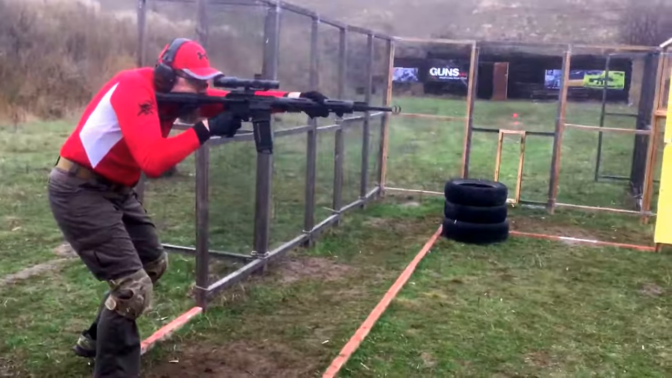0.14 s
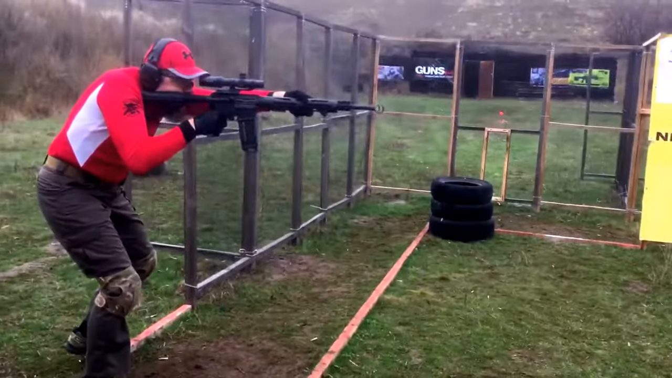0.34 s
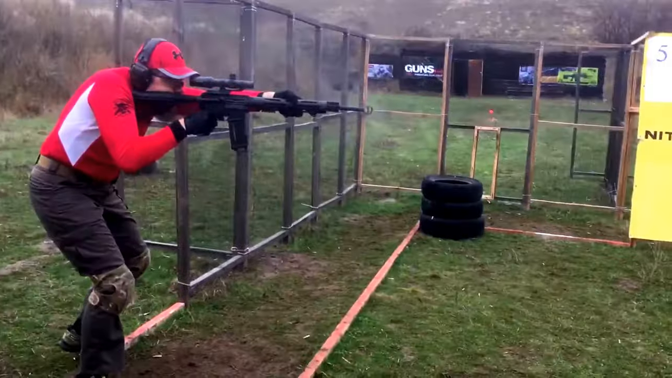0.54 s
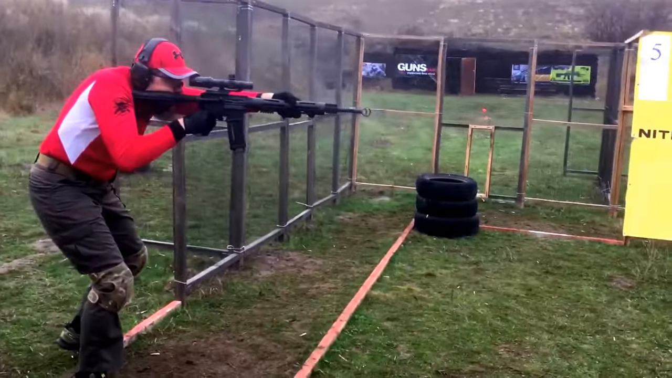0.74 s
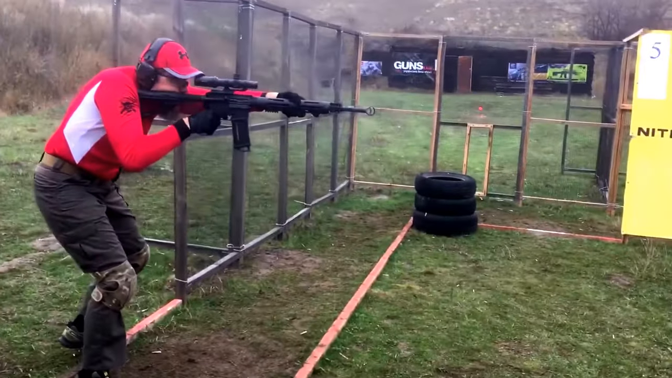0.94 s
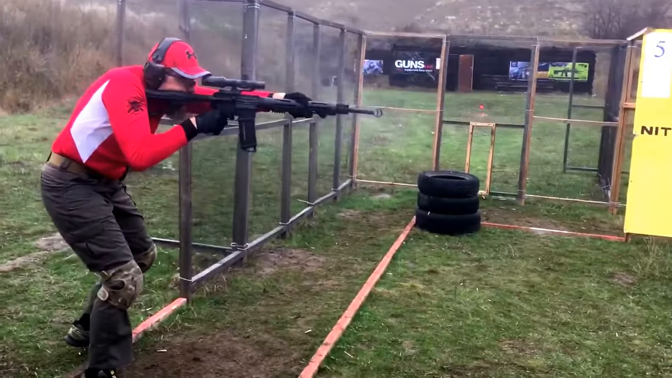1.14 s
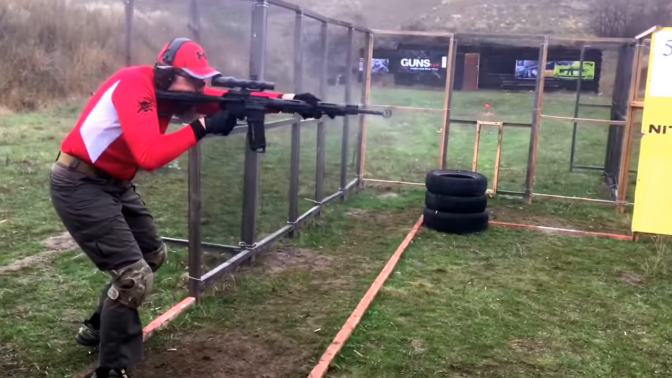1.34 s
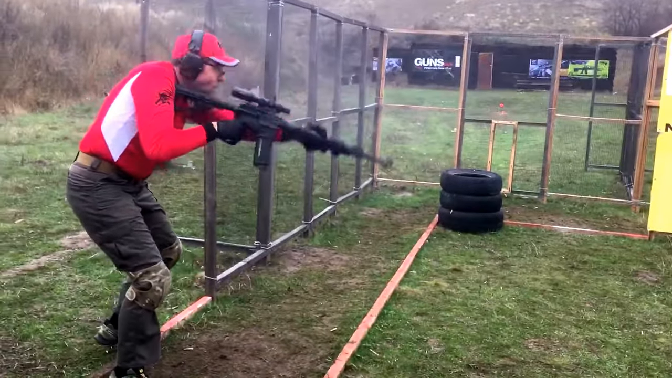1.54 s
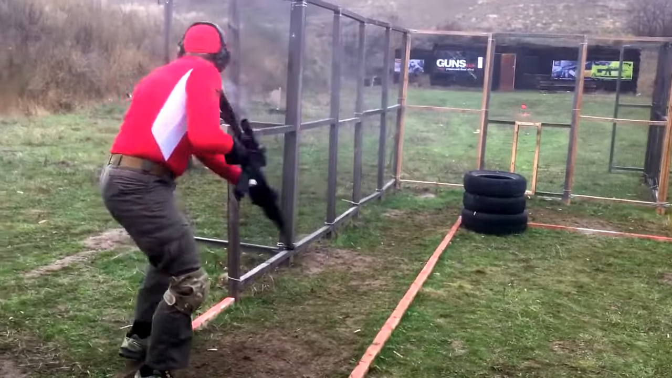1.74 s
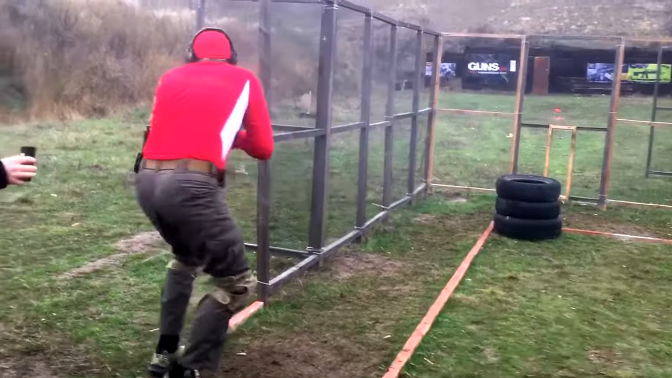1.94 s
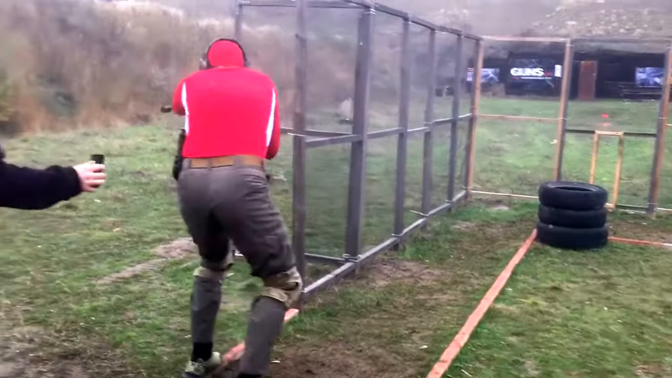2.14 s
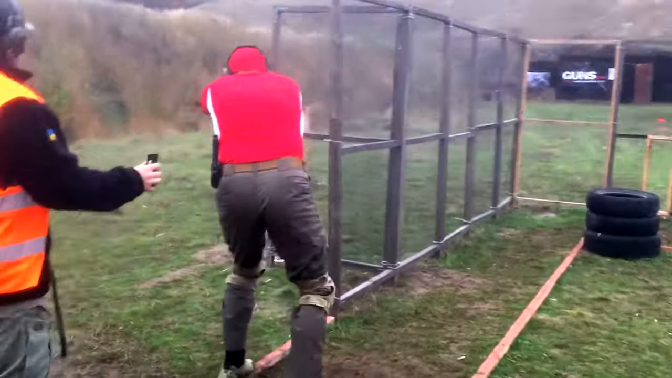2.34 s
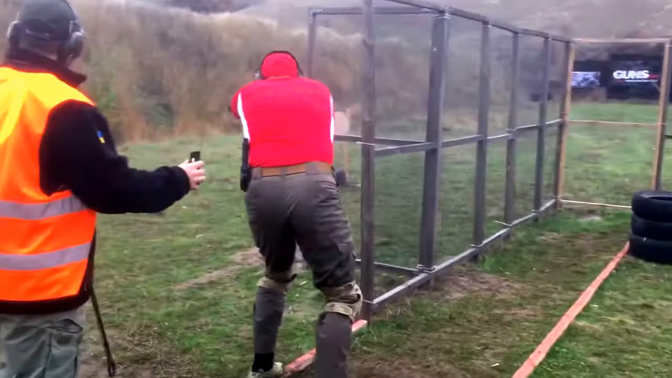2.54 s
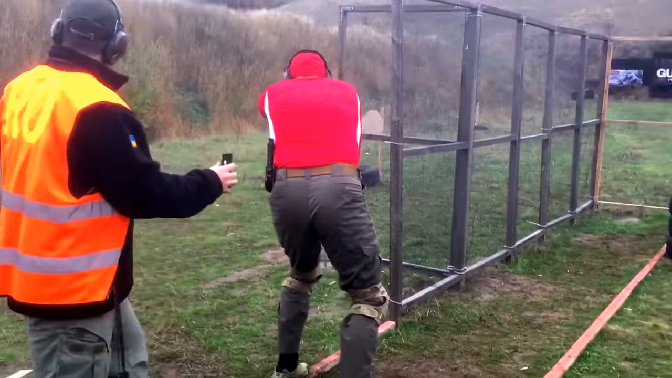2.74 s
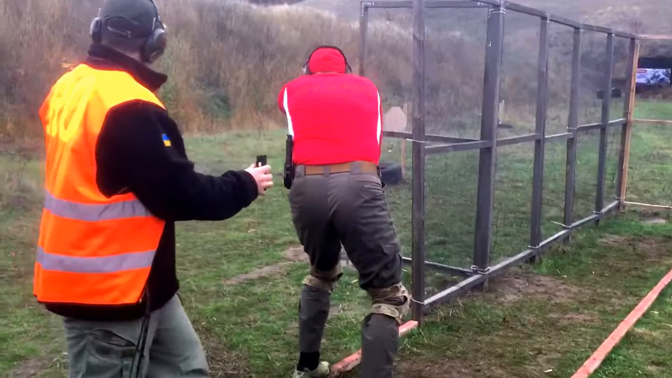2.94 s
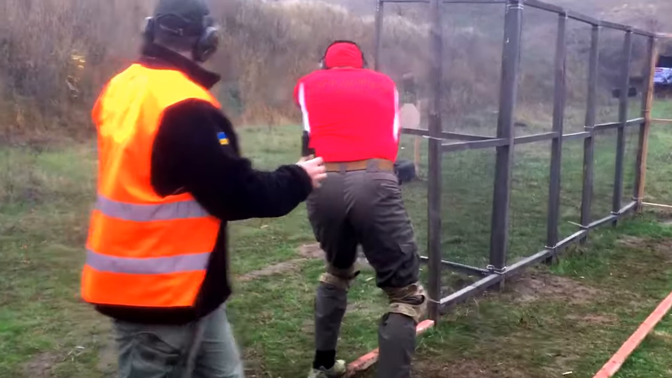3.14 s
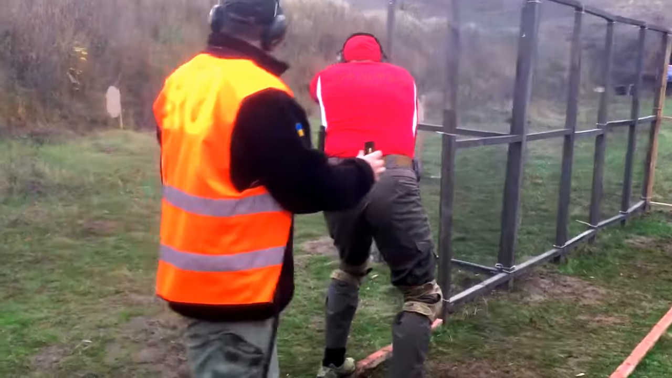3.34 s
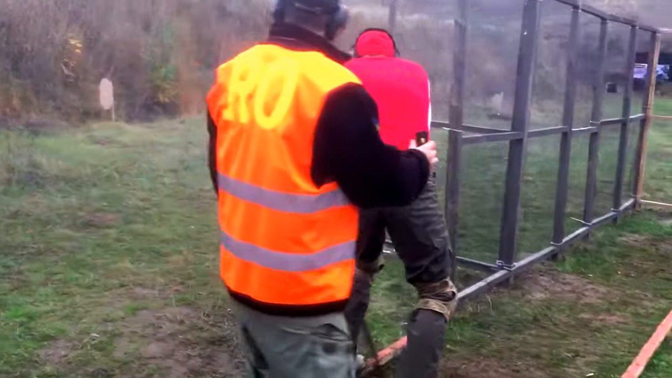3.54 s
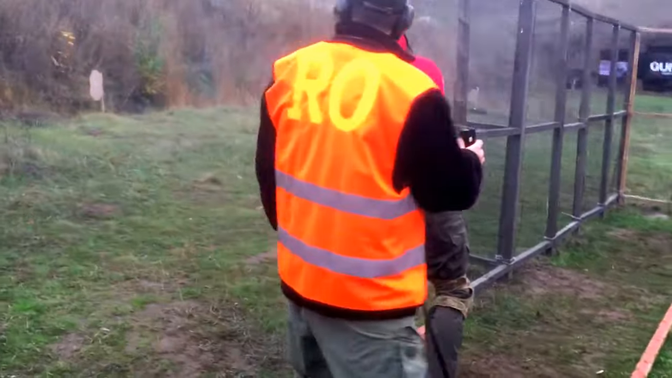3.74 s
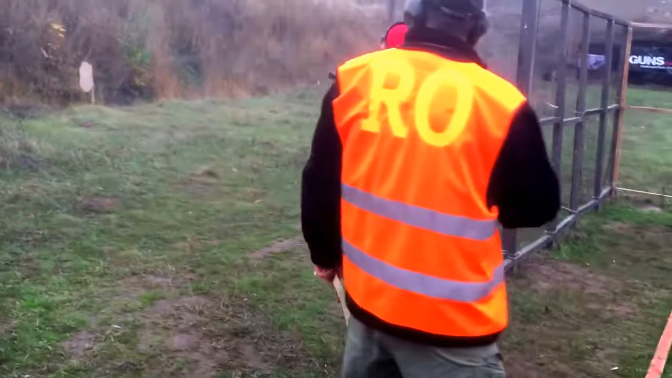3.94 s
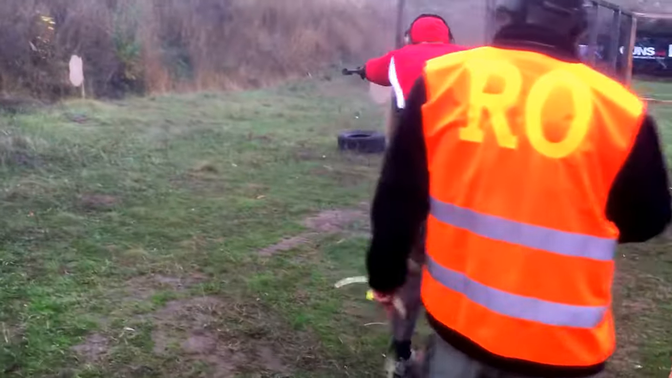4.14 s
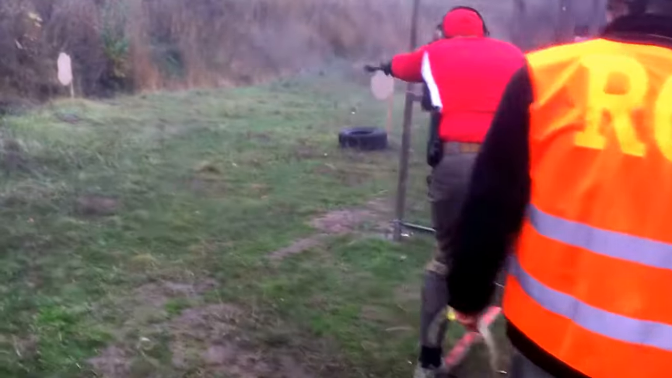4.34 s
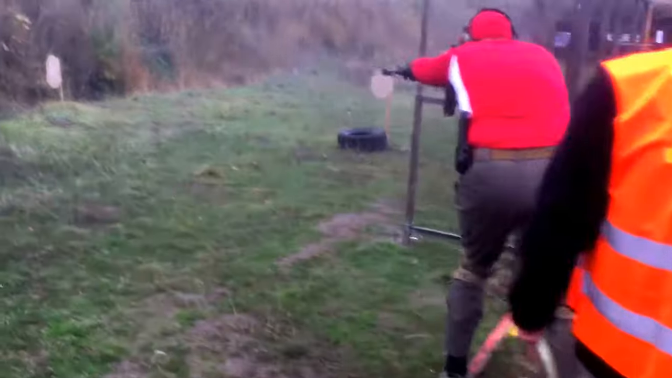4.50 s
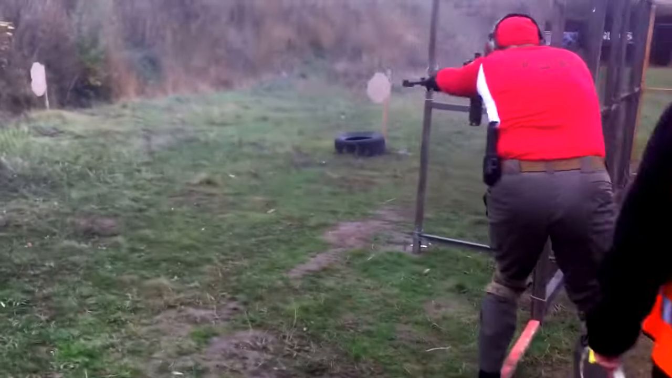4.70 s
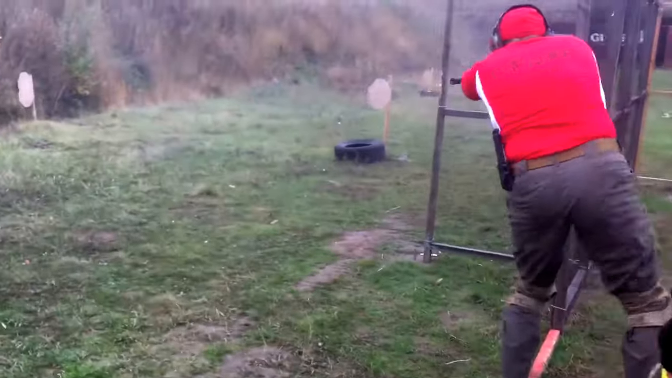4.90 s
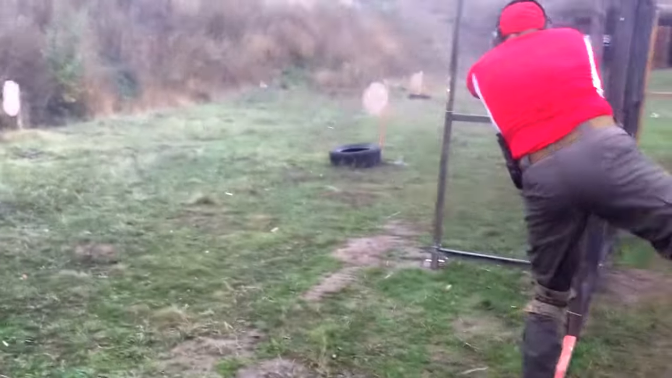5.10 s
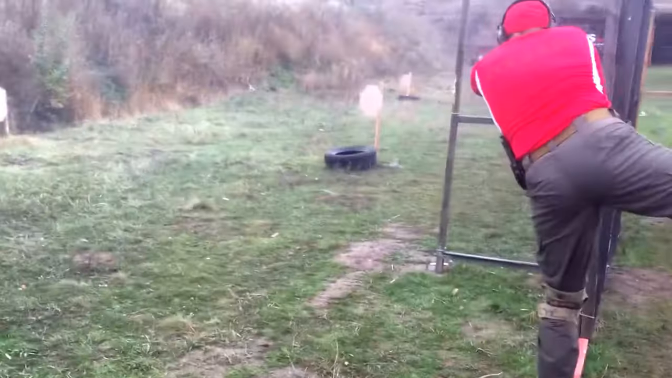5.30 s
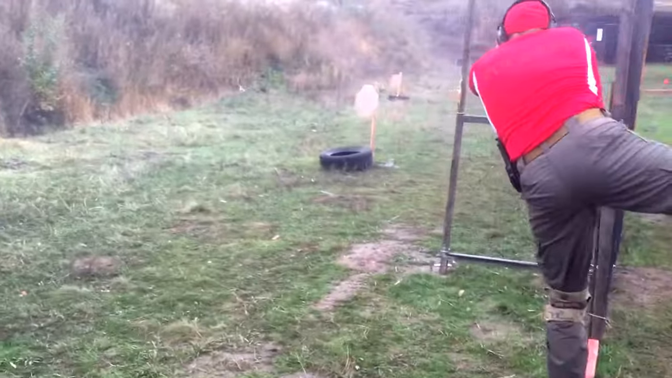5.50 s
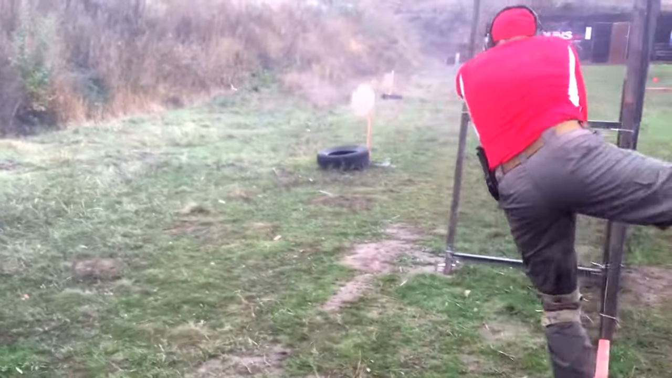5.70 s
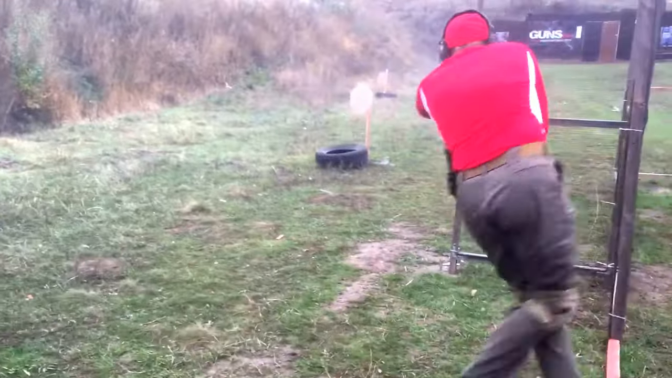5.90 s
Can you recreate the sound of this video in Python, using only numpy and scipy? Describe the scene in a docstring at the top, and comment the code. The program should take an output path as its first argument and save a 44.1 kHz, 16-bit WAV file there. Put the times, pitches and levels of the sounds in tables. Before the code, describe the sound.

Outdoors on a grass range between earth banks, a rifle fires one shot, then a quick pair, pauses with cloth brushing and soft steps, then two spaced shots and two more fast pairs. Every blast overloads the small nearby microphone, slaps off a far wall and fades into a hazy hill echo over low wind.

```python
"""Rifle shots on a grass range

A rifle fires nine shots between earth banks, near a small microphone that overloads.
Each blast is a decaying thump under a dense roar of near reflections, made of noise fading band by band.
A far wall slaps it back in steps of ticks, rings and booms; a distant slope returns a thin falling
chirp and the hills a long wash of noise. Wind, rustle, cloth, gear knocks and footfalls fill the pauses."""
import sys
import numpy as np
from scipy import signal
from scipy.fft import rfft, irfft
from scipy.io import wavfile
from scipy.ndimage import uniform_filter1d

SR = 44100
rng = np.random.default_rng(int(sys.argv[2]) if len(sys.argv) > 2 else 0)


def generate_wav(sig):
    """Save sig (samples, or channels by samples) to the path in sys.argv[1] as 16-bit PCM at SR."""
    pcm = np.round(np.clip(np.atleast_2d(sig).T, -1, 1) * 32767).astype(np.int16)
    wavfile.write(sys.argv[1], SR, pcm)


N = 267246  # samples

# A shot before the start: only its late echoes are still in the air.
EARLIER_SHOT_S, EARLIER_CHIRP_DB = -.46, -45


def amp(db):
    """Decibels to gain."""
    return 10 ** (np.asarray(db) / 20)


def seconds(length):
    """Sample times of a sound of the given length in seconds."""
    return np.arange(round(length * SR)) / SR


def evened(x):
    """Scales to rms 1."""
    return x / np.sqrt(np.mean(x ** 2) + 1e-20)


def add(mix, s, sound):
    """Mixes a sound in at a time in seconds."""
    part = mix[max(round(s * SR), 0):][:len(sound)]
    part += sound[:len(part)]


def spectrum(colour, size):
    """Frequencies and spectrum of noise with the given colour and rms 1."""
    hz = np.fft.rfftfreq(size, 1 / SR)
    colour_hz, colour_db = np.transpose(colour)
    gain = amp(np.interp(np.log(hz + 1), np.log(colour_hz), colour_db, -90, -90))
    z = rfft(rng.standard_normal(size)) * gain
    return hz, z / np.sqrt(np.mean(irfft(z, size) ** 2))


def noise(colour, size):
    """Noise with the given colour and rms 1."""
    return irfft(spectrum(colour, size)[1], size)


def lumps(size, width_s, depth_db):
    """Random gain that wanders at the given pace, with an rms depth in dB."""
    wander = uniform_filter1d(rng.standard_normal(size), max(round(width_s * SR), 1))
    return amp(depth_db * evened(wander))


def ring(hz, t60, rise=.001):
    """A damped vibration: a sine with a soft onset and an exponential decay."""
    t = seconds(.3)
    return np.sin(2 * np.pi * hz * t) * amp(-60 * t / t60) * (1 - np.exp(-t / rise))


def bed(colour, level, pace_s, depth_db):
    """Lumpy coloured noise through the whole scene, evened and then set to a level."""
    return level * evened(noise(colour, N) * lumps(N, pace_s, depth_db))


# Colour of the wind. Each row: frequency in Hz, relative density in dB per Hz.
WIND_COLOUR = [(20, -40.5), (32, -20.5), (45, -6), (65, 2.5), (120, 0), (189, -4.5), (340, -21),
               (520, -38.5)]
# Strength of the wind at the microphone. Each row: time in seconds, level in dB.
WIND_STRENGTH = [(0.0, -57), (1.7, -59), (2.4, -56), (2.65, -64), (3.0, -61), (4.2, -56), (6.0, -58)]


def wind():
    """Gusty wind: low noise whose level wanders around a slow curve."""
    level = amp(np.interp(np.arange(N) / SR, *np.transpose(WIND_STRENGTH)))
    return bed(WIND_COLOUR, level * lumps(N, .06, 2.5), 0.023, 1.5)


# Colour of the wash from the hills. Each row: frequency in Hz, relative density in dB per Hz.
WASH_COLOUR = [(150, -38), (250, -13), (349, -12.5), (571, 0.5), (1050, -2.5), (1400, -3.5), (2000, -10.5),
               (2600, -10.5), (3600, -14.5), (4800, -20), (6200, -25), (8000, -37), (10400, -55)]
# Wash that one shot leaves in the hills. Each row: time after the shot in seconds, level in dB.
HILL_WASH = [(0.05, -64), (.4, -54), (.7, -55), (1.15, -52), (1.35, -57), (1.8, -67), (2.6, -80)]


def hill_wash():
    """Noise that swells and fades after every shot; the washes add by power over a steady floor."""
    t = np.arange(N) / SR
    power = np.full(N, amp(-64) ** 2)
    for s in [EARLIER_SHOT_S] + [row[0] for row in SHOT_LIST]:
        power += amp(np.interp(t - s, *np.transpose(HILL_WASH), -120, -120)) ** 2
    return bed(WASH_COLOUR, np.sqrt(power), .012, 1.8)


# Colour of the steady rustle. Each row: frequency in Hz, relative density in dB per Hz.
RUSTLE_COLOUR = [(3500, -33), (6000, 3.5), (10000, -3), (13000, -4), (16500, -2.5)]


def thin_rustle():
    """A steady thin rustle of treble noise."""
    return bed(RUSTLE_COLOUR, amp(-76), .008, 1.6)


# Colour of brushing clothes. Each row: frequency in Hz, relative density in dB per Hz.
CLOTH_COLOUR = [(4000, -25), (7000, -7), (10000, -3), (13000, -0.5), (16500, -0.5)]
# Brushes of cloth. Each row: middle in seconds, level in dB, length in seconds.
CLOTH_BRUSHES = [(0.014, -69, .012), (2.045, -63, .05), (2.17, -64, .1), (2.4, -72, 1.1), (2.74, -64, .08),
                 (5.3, -76, .15)]


def brushing_clothes():
    """Clothes brush in rounded swells of treble noise."""
    t = np.arange(N) / SR
    level = sum(amp(db) * np.exp(-(2 * (t - s) / length) ** 4) for s, db, length in CLOTH_BRUSHES)
    return bed(CLOTH_COLOUR, level, .006, 1.6)


# Clicks and knocks of gear, and at 3.297 s a bright click at the front of the far wall's slap of the 3.07 s
# shot. Each row: start in seconds, level in dB, pitch in Hz, decay t60 in seconds.
GEAR_KNOCKS = [(.012, -42, 1260, .02), (1.812, -43, 1510, 0.027), (1.958, -38, 1230, .02),
               (2.41, -32, 480, .012), (3.297, -29, 3420, 0.009), (2.424, -45, 1450, .015),
               (5.724, -12, 910, 0.0099), (5.783, -9.5, 1260, 0.0069), (5.885, -29.5, 3400, 0.0093),
               (5.94, -29, 3100, .012)]


def gear_knocks():
    """Each knock is a short damped vibration with a snap of dulled noise at its front."""
    out = np.zeros(N)
    fade = amp(-60 * np.arange(400) / SR / 0.0087)
    for s, db, hz, t60 in GEAR_KNOCKS:
        snap = 0.45 * rng.standard_normal(400) * fade
        add(out, s, amp(db) * ring(hz, t60, 0.11 / hz))
        add(out, s, amp(db) * signal.lfilter([.5], [1, -.6], snap))
    return out


# Thin returns from the distant slope. Each row: middle in seconds after the shot, level in dB on top of
# the shot's chirp level, approximate pitch in Hz, length in seconds.
SLOPE_RETURNS = [(.643, 0.1, 2520, .03), (.687, -8, 2570, .045)]


def slope_chirps():
    """The slope returns each shot as fuzzy chirps: sines of falling pitch with a rough level."""
    out = np.zeros(N)
    shots = [(EARLIER_SHOT_S, EARLIER_CHIRP_DB)] + [(row[0], row[-1]) for row in SHOT_LIST]
    for s, chirp_db in shots:
        for late, db, hz, length in SLOPE_RETURNS:
            t = seconds(length)
            pitch = hz * (1.03 - 0.068 * t / length)
            wave = np.sin(2 * np.pi * np.cumsum(pitch) / SR)
            swell = np.hanning(len(t)) * lumps(len(t), 0.002, 3.9)
            add(out, s + late - length / 2, amp(chirp_db + db) * wave * swell)
    return out


def dull_swell(db, length):
    """Dull noise starts abruptly and swells by 7 dB before the blast."""
    t = seconds(length)
    dull = [(60, -7), (300, 9), (1800, 1), (3200, -5), (3800, -17), (6000, -17), (16400, -25.5)]
    swell = amp(db - 7 * (2.05 - t / length)) * np.minimum(t / .0015, 1)
    return swell * noise(dull, len(t))


# Colour of a bright tick. Each row: frequency in Hz, relative density in dB per Hz.
TICK_COLOUR = [(1500, -24.5), (2800, 1), (4000, 2.5), (7000, -3), (16400, -14)]


def tick(db, t60):
    """A short bright burst of decaying noise."""
    return amp(db - 60 * np.arange(2048) / SR / t60) * noise(TICK_COLOUR, 2048)


def scatter(db, t60, per_s=260):
    """Small separate reflections from posts, mesh and banks, a few strong: random rings of six pitches."""
    t = seconds(1)
    present = rng.random(SR) < per_s / SR
    sizes = amp(5.2 * np.minimum(rng.exponential(1, SR), 4)) * present
    pitch, out = rng.integers(0, 6, SR), np.zeros(SR)
    grains = [(450, -2), (800, 3), (1300, -3.5), (2600, -7.5), (3500, -9), (6200, -18)]  # Hz, dB
    for k, (hz, grain_db) in enumerate(grains):
        grain = ring(hz, 0.0034 + 9. / hz, .0006)[:1500]
        out += amp(grain_db) * signal.oaconvolve(sizes * (pitch == k), grain)[:SR]
    return amp(db - 60 * t / t60) * out


# Colour of the roar of near reflections. Each row: frequency in Hz, relative density in dB per Hz.
ROAR_COLOUR = [(35, -34.5), (60, -1.5), (234, -5.5), (318, -6), (422, -6.5), (659, -6.5), (916, -8),
               (1430, -11), (1940, -17.5), (2700, -16), (4860, -20), (5600, -20.5), (7600, -22.5),
               (9000, -22.5), (10500, -24.5), (12000, -22), (16400, -25)]
# How bands of the roar die away. Each row: upper edge in Hz (the last band is open above), first fall as
# a nominal t60 in seconds (the bend speeds it up), tail level in dB, tail t60 in seconds.
ROAR_FALLS = [(131, 0.16, -23, 0.39), (443, 0.24, -24, 0.44), (980, 0.17, -26.5, .9), (2020, 0.18, -29, .9),
              (5000, 0.18, -22.5, 0.97), (9500, 0.23, -16.5, 0.73), (16000, 0.24, -20, .6)]


def blast(db, thump_db, thump_hz, low_db, treble_db, lag, hold):
    """Near reflections hold the microphone at its limit, fall fast, then fade slowly, band by band."""
    t = seconds(1)
    hz, z = spectrum(ROAR_COLOUR, SR)
    out = amp(thump_db) * np.pad(ring(thump_hz, 0.09, 0.015), (0, SR))[:SR]
    past_hold = np.logaddexp(0, (t - hold) / 0.0067) * 0.0083  # rounded bend, then 1.24 times as fast
    below = 0
    for k, (edge_hz, t60, tail_db, tail_t60) in enumerate(ROAR_FALLS):
        under = 1 / (1 + (hz / edge_hz) ** 8) if k < 6 else 1
        shape = np.hypot(amp(-60 * past_hold / t60), amp(tail_db - 60 * t / tail_t60))
        if k > 3:  # the treble is 20 dB weaker until its lag is over
            shape = shape * amp(treble_db - 20 * (t < lag))
        band_db = thump_db - 4.5 if k == 0 else db + low_db * (k == 1)
        # separate reflections stand out
        shape = shape * amp(band_db) * lumps(SR, .006, 3.2 if k < 4 else 2.1)
        out += shape * irfft(z * (under - below), SR)
        below = under
    add(out, lag, tick(db + treble_db - 2.5, .02))  # the crack at the front
    return (out + scatter(db - 16.5, 0.36)) * np.minimum(t / 0.00027, 1)


def roar_patch(db, hz, length):
    """A short pitched patch in the roar: a sine of wavering pitch under a half-sine swell."""
    t = seconds(length)
    cycles = hz * np.cumsum(lumps(len(t), 0.0056, 0.45)) / SR
    return amp(db) * np.sin(2 * np.pi * (cycles + rng.random())) * np.sin(np.pi * t / length)


# Steps of the far wall. Each row: delay after the first step in seconds, then relative levels of
# tick, ring and boom in dB.
WALL_STEPS = [(0, 4.5, 6, 4), (.02, 0.5, 3, -8), (.039, -10, -9, -8), (.061, -10, -3, -1.5),
              (.077, -36, -26, -25), (.136, -19, -16.5, -14)]
# Colour of the scatter behind the slap. Each row: frequency in Hz, relative density in dB per Hz.
RUMBLE_COLOUR = [(40, -18.5), (80, -3), (170, -2), (320, -13), (600, -20), (3000, -23), (9000, -35.5),
                 (16000, -49.5)]


def slap(db, ring_hz, ring_db, bright_db, boom_hz):
    """Each step of the far wall returns a tick, a short ring and a boom; the banks behind it rumble on."""
    t = seconds(1)
    fade = amp(-10.5 - 60 * t / .75) * np.minimum(t / 0.007, 1)
    out = fade * lumps(SR, .01, 2.44) * noise(RUMBLE_COLOUR, SR)
    out += scatter(-30.5, 0.82)
    near = t[:4096]
    pitch = boom_hz * (0.448 + 0.52 * np.exp(-near / 0.0121))  # the boom widens: its pitch sags
    swell = np.sin(np.pi / 2 * np.minimum(near / .003, 1))
    decay = np.hypot(amp(-60 * near / 0.02), amp(-12.5 - 60 * near / 0.11))
    boom = -np.sin(2 * np.pi * np.cumsum(pitch) / SR) * swell * decay
    for s, tick_db, step_db, boom_db in WALL_STEPS:
        add(out, s, tick(tick_db + bright_db - 3.5, 0.017))
        add(out, s, amp(step_db + ring_db + 9) * ring(ring_hz, 0.0096, 0.0013))
        add(out, s + 0.00068, amp(boom_db + 7.5) * boom)
    return amp(db) * out


# The shots. Each row: start in seconds, roar level in dB, thump level in dB, low-mid trim in dB, treble
# trim in dB, treble lag in seconds, hold in seconds, level in dB (before its swell) and length in seconds
# of the dull noise ahead of the blast, then reference levels of roar patches, slap and chirp in dB.
SHOT_LIST = [(0.425, -12, -5.5, -2, 0, 0.0025, 0.035, -16.5, 0.021, -16, -25, -48),
             (1.0472, -10.5, -6, -9.5, 0.5, 0.0028, 0.033, -20.5, 0.02, -15, -29, -54),
             (1.2161, -12, -8, -4, 1, 0.00093, 0.03, -25, 0.016, -18, -24.5, -46),
             (3.07, -16, -5, 2, 4.5, .01, .045, -17, .013, -5, -24, -51),
             (3.7439, -11.5, -3.5, -0.5, -1, 0.0038, 0.028, -25, 0.022, -19, -25.5, -48),
             (4.3419, -12, -10, -3.5, 0.5, 0.0012, 0.028, -21, 0.02, -10.5, -26, -47.5),
             (4.5061, -12, -6, -3.5, 0.5, 0.0012, 0.027, -22, 0.011, -13.5, -25, -49.5),
             (5.5265, -11.5, -16, -2.5, 1, 0.012, 0.04, -11, 0.012, -7, -28, -48),
             (5.6926, -13, -9.5, 3, 4, 0.0023, 0.006, -32, .008, -16, -25.5, -48)]
# Where the shooter stands sets the thump, roar patches and slap. Each row: from this time in seconds,
# thump pitch in Hz, action level in dB, list of roar patches (middle in seconds after the shot, relative
# level in dB, approximate pitch in Hz, length in seconds), far wall (delay in seconds, ring pitch in Hz,
# relative ring level in dB, relative tick level in dB, boom pitch in Hz before its sag).
SHOOTER_STANCES = [(0.1, 55.5, -28, [(.0185, 0.1, 880, .022), (.036, -3, 640, .022)],
                   (.2268, 1560, -8, -1.5, 330)), (2.9, 55, -32, [(.003, 0.1, 1640, .009),
                   (.008, -5, 1520, .009), (.02, -10, 190, .04)], (.231, 1193, -0.5, -4, 280)),
                   (3.6, 48, -42, [(.029, 0.1, 700, .021), (.033, -1, 1250, .012)],
                   (.2211, 1205, 1.5, -1, 282)), (4.2, 49.5, -38, [(.012, -5, 800, .02),
                   (.028, 0.1, 700, .026)], (.2218, 1110, -4, -4.5, 270)),
                   (5.3, 57, -31, [(.0055, 0.1, 1450, .014), (.042, -8, 173, .06)],
                   (.219, 1090, -1.5, -0.5, 267))]


def rifle():
    """All shots with the clack of the action, the pitched patches in their roar and their slaps."""
    out = np.zeros(N)
    for s, db, thump_db, *body, swell_db, swell_s, patch_db, slap_db, _ in SHOT_LIST:
        stance = [row for row in SHOOTER_STANCES if row[0] < s][-1]
        _, thump_hz, action_db, patches, (wall_delay, *wall) = stance
        add(out, s - swell_s, dull_swell(swell_db, swell_s))
        add(out, s, blast(db, thump_db, thump_hz, *body))
        add(out, s + 0.078, tick(action_db, 0.052))  # the bolt slams home
        for late, relative_db, hz, length in patches:
            add(out, s + late - length / 2, roar_patch(patch_db + relative_db, hz, length))
        add(out, s + wall_delay, slap(slap_db, *wall))
    return out


# Steps on the grass. Each row: start in seconds, level in dB.
STEPS_ON_GRASS = [(2.255, -39), (2.39, -45), (2.457, -35.5), (2.538, -29), (2.76, -48)]
# Vibrations of the turf. Each row: pitch in Hz, relative level in dB, decay t60 in seconds.
TURF_MODES = [(56, 0.1, .14), (150, -12, .06), (196, -12, .045)]


def footfalls():
    """Soft footfalls: each step sets off the same low damped vibrations of the turf."""
    out = np.zeros(N)
    thud = sum(amp(db) * ring(hz, t60, 0.11 / hz) for hz, db, t60 in TURF_MODES)
    for s, db in STEPS_ON_GRASS:
        add(out, s, amp(db) * thud)
    return out


def scene():
    """All sounds of the range in one channel."""
    background = wind() + hill_wash() + thin_rustle() + brushing_clothes()
    return (background + gear_knocks() + slope_chirps() + rifle() + footfalls())[None]


# Dips cut by the microphone housing. Each row: centre in Hz, width in Hz, depth in dB.
HOUSING_DIPS = [(2110, 450, 1), (4780, 650, 4.5), (7750, 700, 3), (10420, 470, 2.5)]


def record(dry):
    """The housing cuts narrow dips; the input saturates on the blasts with a firm knee; then the band limit."""
    ceiling, edge_hz = .72, 15900  # saturation limit (full scale 1), top of the band
    hz = np.linspace(0, SR / 2, 1025)
    housing = amp(-sum(db * np.exp(-((hz - f) / width) ** 2) for f, width, db in HOUSING_DIPS))
    heard = signal.oaconvolve(dry, signal.firwin2(801, hz, housing, fs=SR)[None], "same")
    squeezed = heard / (1 + abs(heard / ceiling) ** 4) ** (1 / 4)
    band_limit = signal.firwin(511, edge_hz, window=("kaiser", 9), fs=SR)
    return signal.oaconvolve(squeezed, band_limit[None], "same")


dry = scene()
out = record(dry)
generate_wav(out)
```